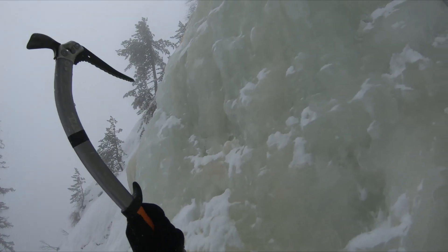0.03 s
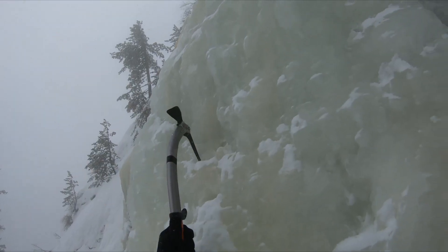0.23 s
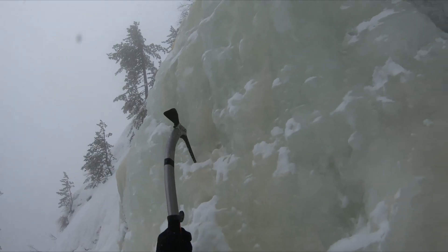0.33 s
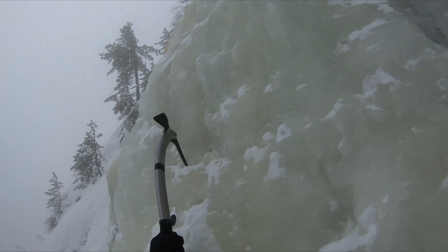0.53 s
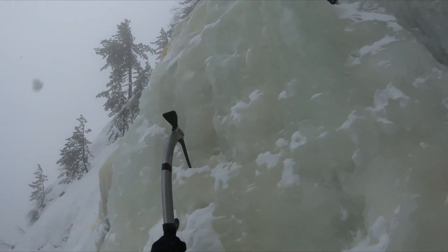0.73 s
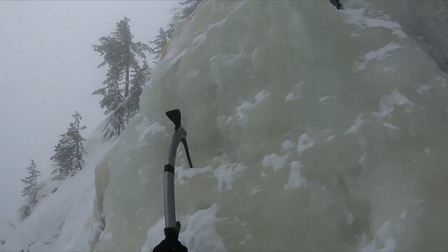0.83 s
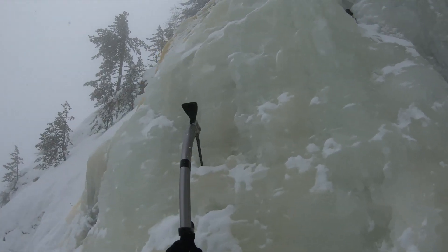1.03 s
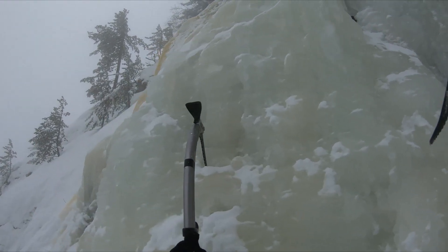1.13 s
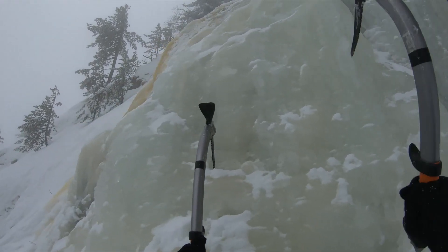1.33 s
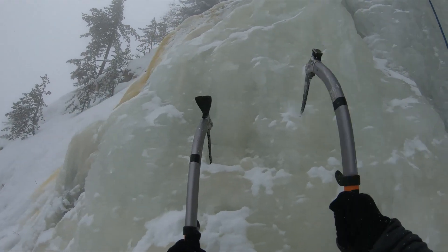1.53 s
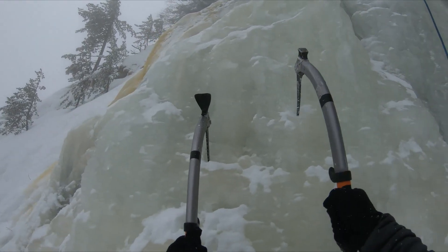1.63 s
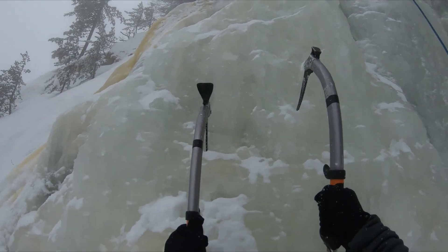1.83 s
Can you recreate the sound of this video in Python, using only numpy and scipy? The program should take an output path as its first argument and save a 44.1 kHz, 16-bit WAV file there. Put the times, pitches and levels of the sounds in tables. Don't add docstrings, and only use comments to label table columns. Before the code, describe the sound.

Two ice axe blows crack into a frozen wall, with tiny chips ticking down between them

```python
import sys
import numpy as np
from scipy import signal
from scipy.fft import rfft, irfft
from scipy.io import wavfile
from scipy.ndimage import uniform_filter1d

SR = 44100
rng = np.random.default_rng(int(sys.argv[2]) if len(sys.argv) > 2 else 0)


def file_out(sig):
    cols = np.atleast_2d(sig).T
    lim = np.clip(cols, -1, 1)
    pcm = np.round(lim * 32767).astype(np.int16)
    wavfile.write(sys.argv[1], SR, pcm)


def magnitude_from_level(level_db):
    exponent = np.asarray(level_db, float) / 20
    return 10 ** exponent


N = 83790

# (time [s], level [dB], brightness [dB per octave])
MOVEMENT = [(0, -63, -1.5), (.1, -67, -0.5), (.2, -65.5, -1.9), (0.399, -62, 1.35), (.52, -67, 0.9),
            (0.679, -65.5, 1.25), (0.923, -62.5, 0.7), (0.993, -74, 0), (1.139, -72.5, 1.5),
            (1.188, -59.5, -0.85), (1.279, -59.5, -2), (1.33, -67, -3), (1.421, -67.5, 0), (1.5, -67, 1.4),
            (1.708, -65, -0.5), (1.77, -58, -1), (1.83, -72, -2), (1.9, -70.5, 0.5)]
# (pitch [Hz], level [dB])
CLOTH_TONE = [(170, -11), (1800, -7), (3300, -8), (4800, -12), (7400, -7), (10400, -16.5), (15600, -19)]
# (pitch [Hz], level [dB])
AIR_TONE = [(200, -11), (1500, -27), (7400, -15), (15600, -25)]
AIR_DB = -77
GRAINS_PER_S, GRAIN_SPREAD_DB, GRAIN_SHARE_DB = 3200, 6, -6.5
PATCH_DB, FLICKER_DB = 3, 1
# (pitch [Hz], likeness [-1 to 1])
LIKENESS = [(950, 0.21), (15000, -0.11)]
FLOOR_PAN_DB = -3.5

LIMITER_TIMES = (0.24, 1.597)
HOLD_S, RELEASE_S, DUCK_DB = 0.113, 0.004, -6

# (start [s], length [s], level [dB], pitch [Hz], width [Hz])
SWISHES = [
    (-.15, .4, -68, 1950, 1150),
    (.82, 0.16, -75, 216, 118.7),
    (.493, .022, -66, 7550, 500),
    (1.569, 0.032, -59.5, 660, 700),
    (1.501, 0.11, -70.5, 3400, 600),
    (1.699, 0.1, -72, 3400, 490),
    (1.755, 0.072, -69, 327, 150),
]
# (start [s], level [dB], length [s], left-right [dB])
SCRAPES = [
    (0.217, -47, 0.038, -5),
    (0.371, -60.5, 0.087, -2),
    (0.699, -55.5, 0.08, -8),
    (.733, -47.5, 0.017, -7.5),
    (0.838, -62, 0.04, 7),
    (1.235, -60.5, 0.058, -0.5),
    (1.332, -66.5, 0.18, -2),
]
CRUMBS_PER_S = 3100
# (time [s], level [dB], pitch [Hz], time to fall 60 dB [s])
BODY_JOLTS = [
    (0.249, -33.5, 80, 0.083),
    (0.299, -50, 30, 0.15),
    (1.597, -48.5, 81.7, 0.096),
    (1.618, -45.5, 46.2, 0.095),
]

# (time [s], peak level [dB], pitch [Hz])
HIGH_CHIPS = [
    (0.0386, -50, 6550),
    (0.1162, -50, 8400),
    (0.171, -48.5, 6200),
    (0.3535, -49, 6500),
    (0.6734, -55.5, 6340),
    (0.9096, -50.5, 8700),
    (1.035, -55, 7510),
    (1.8492, -58, 6100),
]
# (time [s], peak level [dB], pitch [Hz])
FALLING_CHIPS = [(0.4567, -49.5, 3330), (0.5555, -41.5, 2770), (0.5634, -48, 2900), (0.5882, -49, 3050),
                 (0.5959, -45.5, 3480), (0.6081, -52, 3120), (0.6164, -49, 3070), (0.621, -42, 1800),
                 (0.6496, -48.5, 3400), (0.7217, -50.5, 3700), (0.7481, -35.5, 2840), (0.7644, -50, 2760),
                 (0.7946, -51, 5800), (0.8096, -58, 6460), (0.8257, -49, 5560), (0.8295, -47.5, 5630),
                 (0.85, -47, 3400), (0.8574, -43.5, 3640), (0.8673, -53, 6640), (0.8777, -44.5, 3850)]
CHIP_S, CHIP_CRUMBLE_S, CHIP_PAN_DB, CHIP_GAIN_DB = 0.0018, 0.0061, 7, 2
SLIVER_CUT_HZ, TICK_CUT_HZ = 1340, 5100
CLICKS, RING_CYCLES, SPLINTER_DB, CRUMBLE_DB = 4, 12, 1, -20
# (pitch [Hz], level [dB])
SNAP_TONE = [(150, -32.5), (1500, -26), (2500, -3.5), (4000, -6), (6200, -4), (9000, -17.5), (15700, -32)]
# (pitch [Hz], level [dB], time to fall 60 dB [s])
HOUSING_MODES = [(2010, -4, 0.013), (3400, 3.2, 0.0054), (4450, -6, 0.0043), (5630, -11.5, 0.0033),
                 (6560, -19.5, 0.003), (8800, -11.5, 0.0061)]
HOUSING_DB = -8

# (time [s], level [dB], pitch factor, brightness [dB per octave])
LEFT_THUDS = [(.232, -37.5, 0.99, 3), (0.2404, -33, 0.72, -4), (0.2492, -22, 0.99, 2.1),
              (0.252, -30, 0.9, -10), (.267, -39, 0.99, 1), (.2815, -41.5, 0.92, 3.3),
              (.458, -67, 1.03, 7.5), (.557, -54, 0.91, -2.5), (.612, -54, 1.09, 3),
              (.722, -56.5, 1.06, -4), (1.366, -54.5, 0.96, 4.5), (1.883, -66.5, 1.9, 5),
              (1.892, -67, 1.19, 9.5)]
# (pitch [Hz], level [dB], time to fall 60 dB [s])
LEFT_SHAFT = [(169, -6, 0.04), (203, 1.5, 0.035), (325, -9.5, 0.036), (467, 1, 0.03), (738, -5, 0.044),
              (1080, -18.5, 0.0141)]
# (time [s], level [dB], pitch factor, brightness [dB per octave])
RIGHT_THUDS = [
    (1.588, -44.5, 1.82, 2.5),
    (1.5975, -30, 1.022, 0),
    (1.609, -45, 0.946, -1),
]
# (pitch [Hz], level [dB], time to fall 60 dB [s])
RIGHT_SHAFT = [(143.2, -3, 0.069), (266.6, -0.5, 0.016), (481, 8, 0.019), (770, -6, 0.047),
               (1025, 0, 0.0185)]
# (pitch [Hz], level [dB], time to fall 60 dB [s])
STEEL_MODES = [(6874, -48, .095), (6643, -52, .09), (7120, -56, .05), (3284, -60, .1)]
STEEL_AT_S = 1.596

# (time [s], level [dB], rise [s], pitch [Hz], left-right [dB])
LEFT_CRACKS = [(0.2313, -33.5, 0.0016, 5400, -3), (0.2315, -32.5, 0.00087, 2480, -5),
               (0.2346, -27, 0.0014, 1860, 2.2), (0.2355, -26.5, 0.0011, 3590, 5.5),
               (0.2357, -19, 0.00081, 2940, 1), (0.2359, -25, 0.00032, 5620, -2.5),
               (0.237, -27.5, 0.00035, 3150, -5.2), (0.2389, -19.5, 0.00042, 2826, -2),
               (0.2395, -29, 0.00047, 1870, -0.5), (0.2399, -28.5, 0.0006, 3500, 0.4),
               (0.2441, -23.5, 0.00069, 2900, -0.6), (0.2443, -26.9, 0.001, 3250, 0),
               (0.2451, -23.7, 0.00056, 4550, 0.2), (0.2457, -29, 0.00056, 1660, 2),
               (0.2476, -17, 0.00041, 3230, -3), (0.2489, -27, 0.00071, 1947, -5.5),
               (0.2495, -29.5, 0.0011, 3285, -1.8), (0.2536, -34, 0.0015, 3445, -1.5),
               (0.2551, -18, 0.0002, 2590, 0.8), (0.2633, -28.5, 0.0014, 1984, 0.2),
               (0.2652, -30.5, 0.00104, 2924, -1), (0.2662, -30, 0.0007, 4650, 0.4),
               (0.2666, -29, 0.0006, 1946, -4), (0.2712, -34, 0.00054, 4370, -3.5),
               (0.2717, -29, 0.00024, 2140, -1), (0.2719, -33, 0.0012, 2870, 3),
               (0.2757, -29.3, 0.0006, 3170, -2), (0.2758, -33, 0.000354, 4620, 2),
               (0.2781, -31, 0.00031, 3190, -3.8), (0.2811, -35, 0.00035, 3220, -1.5)]
# (time [s], level [dB], rise [s], pitch [Hz], left-right [dB])
RIGHT_CRACKS = [(1.5894, -32.5, 0.00091, 1434, -12), (1.5895, -34, 0.00089, 6710, 10),
                (1.5895, -23.5, 0.0011, 3120, -7.5), (1.5897, -31.5, 0.0018, 4090, -3.5),
                (1.591, -21, 0.00071, 6150, 9.5), (1.5918, -31, 0.001, 3490, -3.5),
                (1.5919, -24, 0.00026, 8660, -10.5), (1.5939, -37, 0.0006, 6910, 6.2),
                (1.595, -20, 0.00049, 2400, -1), (1.595, -18, 0.00094, 3340, -6),
                (1.5952, -33, 0.00012, 4270, -5), (1.5961, -26, 0.00027, 6940, 18),
                (1.5962, -36, 0.0012, 2126, -6)]
# (time [s], level [dB], length [s])
LEFT_GRIT = [
    (0.2326, -33.5, 0.0016),
    (0.2351, -30, 0.0043),
    (0.2433, -31.5, 0.0049),
    (0.256, -45.5, 0.0062),
    (0.2642, -39.5, 0.0048),
    (.2713, -37.5, 0.0017),
    (0.2749, -38, .003),
    (0.281, -54, 0.014),
]
# (time [s], level [dB], length [s])
RIGHT_GRIT = [
    (1.585, -51, .004),
    (1.5896, -31, 0.0035),
    (1.595, -31, 0.0035),
    (1.601, -58, .012),
]
# (pitch [Hz], level [dB])
GRIT_TONE = [(1300, -10), (2500, -1), (5500, -4.5), (9000, -7.5), (11500, -18), (15700, -24.5)]
LEFT_CRUMBLE_S, RIGHT_CRUMBLE_S, GRIT_APART, GRIT_PER_S = 0.0025, 0.001, 0.5, 4000
# (pitch [Hz], phase [rad])
LEFT_PHASE = [(100, 0.034), (1000, 0.8), (3000, 0.44), (6000, 0.57), (9000, 2.77), (14000, 1.7)]
# (pitch [Hz], phase [rad])
RIGHT_PHASE = [(100, 0), (1000, 1), (3000, 0.2), (6000, 0.6), (9000, -3), (14000, -1)]

LOW_CUT_HZ, TOP_HZ, LEAK_DB = 150, 9920, -12


def evened(x):
    return x / np.sqrt(np.mean(x ** 2) + 1e-20)


def sides(db):
    return magnitude_from_level(np.array([[0.5], [-0.5]]) * db)


def read(points, hz):
    f, value = np.transpose(points)
    return np.interp(np.log(hz + 1), np.log(f + 1), value)


def add(mix, s, sound):
    part = mix[..., round(s * SR):][..., :sound.shape[-1]]
    part += sound[..., :part.shape[-1]]


def causal(points, size=1024):
    log_gain = np.log(magnitude_from_level(read(points, np.abs(np.fft.fftfreq(4 * size, 1 / SR)))))
    click = np.fft.ifft(np.exp(np.conj(signal.hilbert(log_gain)))).real[:size]
    return click / abs(click).max()


def mode(hz, db, t60, size=9000):
    t = np.arange(size) / SR
    return magnitude_from_level(db - 60 * t / max(t60, 1e-3)) * np.sin(2 * np.pi * hz * t)


def rumble():
    low_pass = signal.butter(4, 55, fs=SR, output="sos")
    wind = signal.sosfilt(low_pass, rng.standard_normal((2, N)))
    return magnitude_from_level(-90.5) * evened(wind + 0.37 * wind[::-1])


def background():
    caught = rng.random((3, N)) < GRAINS_PER_S / SR
    size = magnitude_from_level(GRAIN_SPREAD_DB * np.minimum(rng.exponential(1, (3, N)), 5)) * caught
    grains = evened(size * rng.standard_normal((3, N)))
    friction = grains * magnitude_from_level(GRAIN_SHARE_DB) + rng.standard_normal((3, N))
    noises = np.vstack([friction[:2], rng.standard_normal((2, N))])
    hz, t, z = signal.stft(noises, SR, nperseg=512, noverlap=384)
    same = np.clip(read(LIKENESS, hz), -1, 1)[:, None]

    def pair(a, b):
        return np.array([a, same * a + np.sqrt(1 - same ** 2) * b])

    patches = uniform_filter1d(rng.standard_normal(z[0].shape), size=8, axis=0)
    patches = evened(uniform_filter1d(patches, size=14, axis=1))
    flicker = evened(uniform_filter1d(rng.standard_normal(len(t)), size=4))
    s, level_db, bright_db = np.transpose(MOVEMENT)
    octaves = np.log2((hz[:, None] + 100) / 3000)
    cloth_db = read(CLOTH_TONE, hz)[:, None] + octaves * np.interp(t, s, bright_db)
    cloth = magnitude_from_level(cloth_db) / np.sqrt(np.mean(magnitude_from_level(2 * cloth_db), 0))
    cloth = cloth * magnitude_from_level(np.interp(t, s, level_db) + PATCH_DB * patches + FLICKER_DB * flicker)
    air = magnitude_from_level(AIR_DB) * evened(magnitude_from_level(read(AIR_TONE, hz)))[:, None]
    both = pair(z[0], z[1]) * cloth + pair(z[2], z[3]) * air
    sound = signal.istft(both, SR, nperseg=512, noverlap=384)[1][:, :N]
    return sound * sides(FLOOR_PAN_DB)


def limiter_hold():
    t = np.arange(N) / SR
    held = sum((t > s) * np.clip(1 - (t - s - HOLD_S) / RELEASE_S, 0, 1) for s in LIMITER_TIMES)
    return magnitude_from_level(DUCK_DB * held)


def swishes():
    out, t = np.zeros((2, N)), np.arange(N) / SR
    for s, length, db, hz, width in SWISHES:
        band = signal.butter(4, [hz - width / 2, hz + width / 2], "band", fs=SR, output="sos")
        noise = rng.standard_normal((3, N))
        swell = np.sqrt(np.sin(np.pi * np.clip((t - s) / length, 0, 1)).clip(0))
        out += magnitude_from_level(db) * swell * evened(signal.sosfilt(band, noise[:2] + noise[2]))
    return out


def sways():
    out = np.zeros(N)
    for s, db, hz, t60 in BODY_JOLTS:
        soft_start = np.minimum(np.arange(16000) / SR * hz, 1)
        add(out, s, mode(hz, db, t60, size=16000) * soft_start)
    return out


def splinter():
    return causal(SNAP_TONE) + magnitude_from_level(HOUSING_DB) * sum(mode(*m, size=1024) for m in HOUSING_MODES)


def scrapes():
    out = np.zeros((2, N))
    for s, db, length, pan_db in SCRAPES:
        struck = rng.random((2, 6000)) < CRUMBS_PER_S / SR
        crumbs = rng.standard_normal((2, 6000)) * (0.64 + struck)
        swell = np.sin(np.pi * np.clip(np.arange(6000) / SR / length, 0, 1)) ** 2
        scrape = evened(signal.fftconvolve(crumbs, splinter()[None], axes=1)[:, :6000])
        add(out, s, magnitude_from_level(db) * sides(pan_db) * scrape * swell)
    return out


def fracture(db, length, hz, crumble_s, snap_db, cut_hz):
    draw, t = rng.random((CLICKS, 3)), np.arange(2048) / SR
    order = np.arange(CLICKS)
    places = ((order + draw[:, 0]) / CLICKS * length * SR).astype(int)
    strengths = (0.5 + draw[:, 1]) / np.sqrt(1 + order) * np.sign(draw[:, 2] - 0.5)
    clicks = np.zeros(2048)
    np.add.at(clicks, places, strengths)
    fade = np.exp(-np.maximum(t - length, 0) / crumble_s)
    grit = magnitude_from_level(CRUMBLE_DB) * rng.standard_normal(2048) * fade * np.minimum(2 * t / length, 1)
    snap = magnitude_from_level(snap_db) * splinter()
    ring_t60 = np.log(1000) * RING_CYCLES / hz / 2
    sliver = mode(hz, 0, ring_t60, size=1024) + magnitude_from_level(SPLINTER_DB) * snap
    sound = signal.fftconvolve(clicks, sliver) + signal.fftconvolve(grit, snap)
    sound = signal.sosfilt(signal.butter(4, cut_hz, "high", fs=SR, output="sos"), sound)
    return magnitude_from_level(db) * sound / abs(sound).max()


def chips():
    out = np.zeros((2, N))
    for rows, snap_db, cut_hz in ((FALLING_CHIPS, -2.5, SLIVER_CUT_HZ), (HIGH_CHIPS, -9, TICK_CUT_HZ)):
        for s, db, hz in rows:
            pan = sides(CHIP_PAN_DB * rng.standard_normal() + FLOOR_PAN_DB)
            add(out, s, pan * fracture(db + CHIP_GAIN_DB, CHIP_S, hz, CHIP_CRUMBLE_S, snap_db, cut_hz))
    return out


def thuds(rows, shaft):
    out = np.zeros(N)
    for s, db, factor, bright_db in rows:
        for hz, mode_db, t60 in shaft:
            tilt_db = bright_db * np.log2(hz / 200)
            add(out, s, mode(hz * factor, db + mode_db + tilt_db, t60) / 2)
    return out


def steel_ring():
    return sum(mode(*m) for m in STEEL_MODES)


def blow(cracks, grits, crumble_s, pan_db):
    out, t = np.zeros((2, N)), np.arange(2048) / SR
    for (s, db, rise, hz, side_db), turn in zip(cracks, rng.random(len(cracks))):
        swell = t / rise * np.exp(1 - t / rise)
        ring = swell * np.cos(2 * np.pi * (hz * t + turn))
        add(out, s, magnitude_from_level(db) * sides(side_db) * ring)
    for s, db, length in grits:
        crushed = rng.random(2048) < GRIT_PER_S / SR
        shared = rng.standard_normal(2048) * (0.2 + 3 * crushed)
        apart = rng.standard_normal((2, 2048))
        fade = np.exp(-np.maximum(t - length, 0) / crumble_s)
        tone = evened(causal(GRIT_TONE))[None] / np.sqrt(1024)
        crunch = signal.fftconvolve((shared + GRIT_APART * apart) * fade, tone, axes=1)
        add(out, s, magnitude_from_level(db) * sides(pan_db) * crunch)
    return out


def ports(x, phase):
    half = np.exp(0.5j * read(phase, np.fft.rfftfreq(N, 1 / SR)))
    return irfft(rfft(x) * np.array([half, 1 / half]), N)


def microphone(x):
    x = signal.sosfilt(signal.butter(4, LOW_CUT_HZ, "high", fs=SR, output="sos"), x)
    muffled = signal.sosfiltfilt(signal.butter(8, TOP_HZ, fs=SR, output="sos"), x)
    return muffled * (1 - magnitude_from_level(LEAK_DB)) + magnitude_from_level(LEAK_DB) * x


def scene():
    left = blow(LEFT_CRACKS, LEFT_GRIT, LEFT_CRUMBLE_S, pan_db=-1.5)
    right = blow(RIGHT_CRACKS, RIGHT_GRIT, RIGHT_CRUMBLE_S, pan_db=-5.0)
    add(right, STEEL_AT_S, steel_ring())
    hits = ports(left, LEFT_PHASE) + ports(right, RIGHT_PHASE)
    knocks = thuds(LEFT_THUDS, LEFT_SHAFT) * magnitude_from_level(np.array([[-1.1], [1.1]]))
    knocks = knocks + thuds(RIGHT_THUDS, RIGHT_SHAFT) * magnitude_from_level(np.array([[-2.1], [1.6]]))
    airborne = hits + knocks + chips() + scrapes() + swishes()
    return microphone(airborne + background() * limiter_hold()) + sways() + rumble()


def band_limit(x):
    return signal.sosfilt(signal.butter(12, 15790, fs=SR, output="sos"), x)


def record(dry):
    edge = signal.firwin(255, 15750, fs=SR)[None]
    mix = signal.oaconvolve(dry, edge, "same")
    return band_limit(mix)


dry = scene()
out = record(dry)
file_out(out)
```